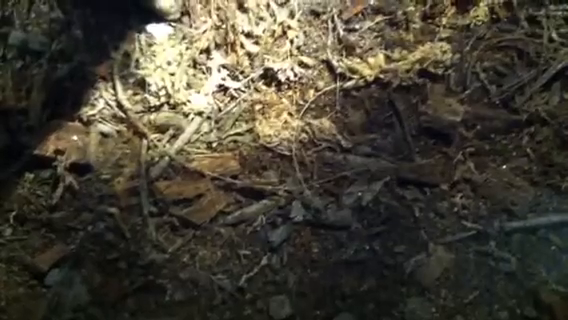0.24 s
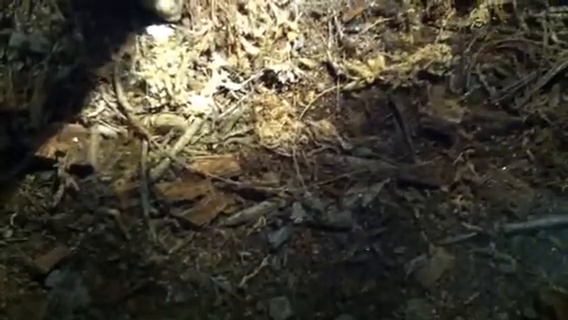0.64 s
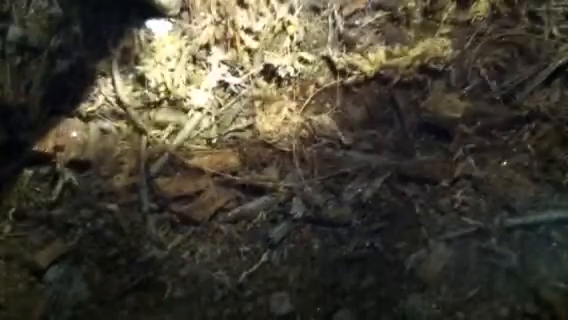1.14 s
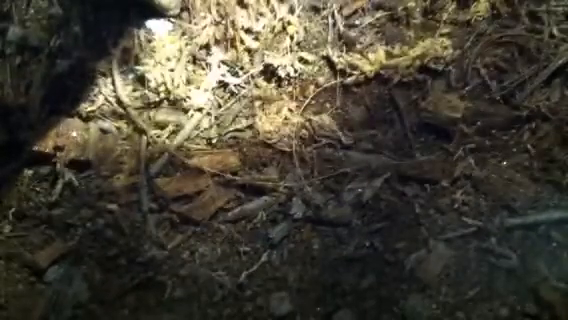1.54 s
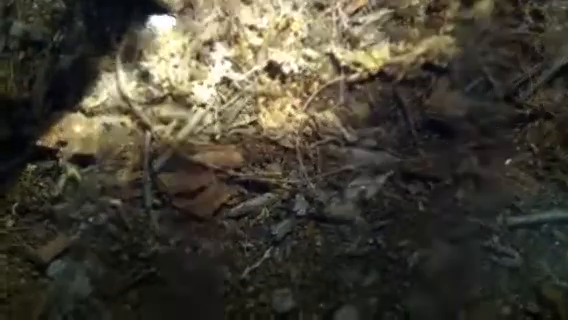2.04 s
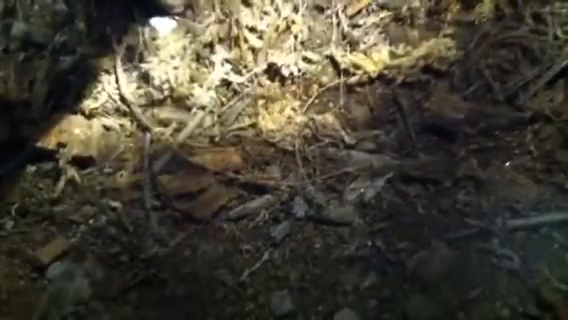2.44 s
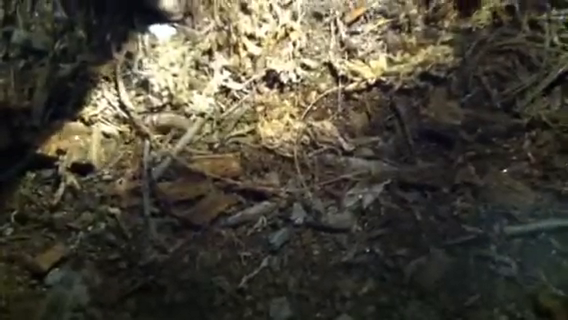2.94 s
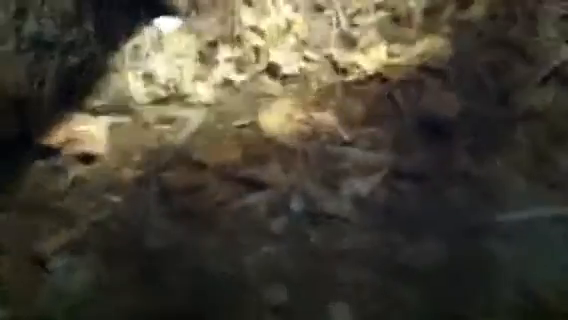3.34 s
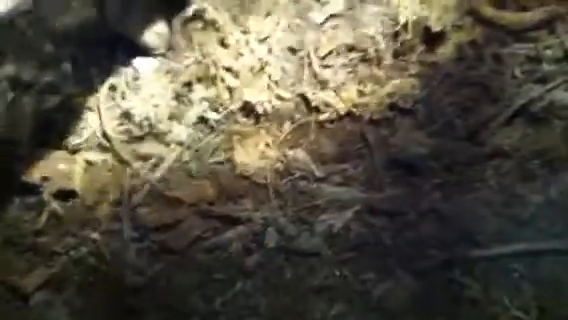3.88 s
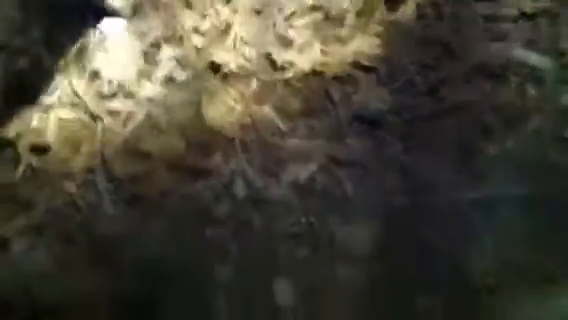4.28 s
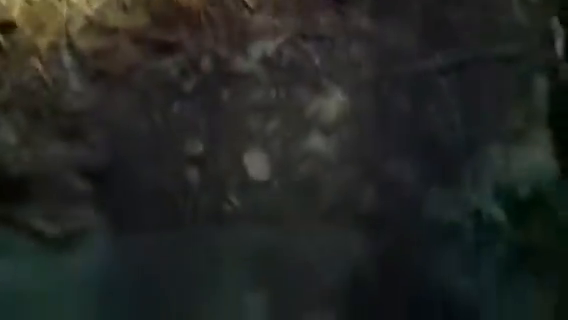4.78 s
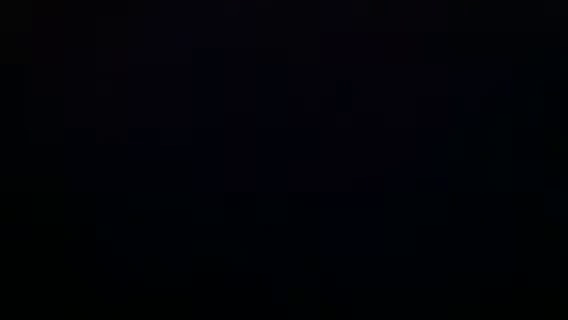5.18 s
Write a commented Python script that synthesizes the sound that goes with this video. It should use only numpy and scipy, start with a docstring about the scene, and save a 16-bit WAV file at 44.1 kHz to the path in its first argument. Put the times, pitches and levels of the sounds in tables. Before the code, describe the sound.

Hands fumble close up at a small soil enclosure: irregular taps, soft thuds, dry litter rustles, then hard plastic knocks and scrapes.

```python
"""Hands at a small soil enclosure

Close up in a quiet room, fingers tap the walls of an enclosure of soil and moss, pat the soil and brush
the litter: coloured noise bursts, panel modes and streams of grains. Skin rubs and rasps along the wall.
A hard plastic edge bumps, drags and catches in sharp ticks, and the floor booms: struck and scraped modes.
Late on, a palm lands and rubs. Filtered noise makes the room air, and a wavering sine the faint fan.
"""
import sys
import numpy as np
from scipy import signal
from scipy.fft import rfft, irfft
from scipy.io import wavfile
from scipy.ndimage import uniform_filter1d, map_coordinates

SR = 44100
rng = np.random.default_rng(int(sys.argv[2]) if len(sys.argv) > 2 else 0)


def store_wav(level_fs):
    """Save 16-bit WAV to argv[1]."""
    pcm = np.round(np.clip(np.atleast_2d(level_fs), -1, 1) * 32767)
    wavfile.write(sys.argv[1], SR, pcm.T.astype(np.int16))


N = 238845
TIME = np.arange(N) / SR  # seconds
HIT_SIZE = 8192  # samples in a single hit
AGE = np.arange(HIT_SIZE) / SR  # seconds since the hit began

# Spectrum of the room air. Each row: frequency in Hz, gain in dB.
ROOM_COLOUR = [(30, -43.5), (80, -40), (115, -8.5), (190, -8.5), (222, -9.5), (255, -17.5), (300, -18.5),
               (1140, -25.5), (2100, -26), (4450, -29.5), (5150, -37), (8300, -41), (15500, -61.5)]
AIR_DB = -58.5
FAN_HZ, FAN_DB = 220.7, -56

# Slides of the fingers along the wall. Each row: start in seconds, end in seconds, top speed from 0 to 1.
FINGER_SLIDES = [(0.613, 1.86, 0.8), (1.77, 2.768, 0.86), (2.65, 3.6, 0.3), (4.965, 5.697, 0.84)]
# Spectrum of skin rubbing the wall. Each row: frequency in Hz, gain in dB.
RUB_COLOUR = [(100, -14), (250, 13), (550, 0), (1400, -3), (2900, -3.5), (3700, -9), (4600, 1),
              (5300, -18.5), (8000, -5.5), (14000, -28)]
# Spectrum of the thin hiss of fast skin. Each row: frequency in Hz, gain in dB.
HISS_COLOUR = [(2000, -36), (6500, -6), (7900, -5), (9100, 1), (10300, -15.5), (13000, -23.5), (15000, -38)]
SPEED_UP_S, SLOW_DOWN_S, RESTING_SPEED = 0.22, 0.4, 0.031
RUB_DB, HISS_DB = -54.5, -59.5  # at full speed
RUB_GROWTH, HISS_GROWTH = 0.35, 2.4  # each grows as this power of the speed
RUB_WAVER_DB = 1.2

# Strokes through the litter. Each row: start in seconds, rise in seconds, dying away as t60 in seconds,
# level in dB ahead of the tone shelves, treble lift in dB.
LITTER_STROKES = [(.07, .03, 0.27, -64.5, -21), (0.62, 0.02, 0.47, -52.5, -15.5),
                  (0.84, 0.037, 0.091, -33, 1), (0.9, 0.025, 0.096, -31.5, -2.5),
                  (1.16, 0.016, 0.46, -36, -1.5), (1.412, 0.061, 0.083, -49.5, 13),
                  (1.56, .04, 0.4, -64.5, 19.5), (2.09, 0.0068, 0.24, -40, -14.5),
                  (2.29, 0.018, 0.17, -35.5, 4), (2.42, .09, 0.64, -41.5, -0.5),
                  (4.345, 0.026, 0.27, -47, -2), (5.1, 0.12, 0.23, -44.5, 10.5)]
# Spectrum of the crackling fibres. Each row: frequency in Hz, gain in dB.
LITTER_COLOUR = [(60, -15.5), (200, 8.5), (350, 6), (540, -5.5), (950, 1.5), (2000, -8.5), (4500, -8),
                 (5300, -16.5), (8000, -10), (12500, -27.5), (15000, -35)]
# Modes of the enclosure. Each row: frequency in Hz, average level in dB, t60 in seconds.
ENCLOSURE_MODES = [(155, -10, 0.069), (190, -1.5, 0.0297), (276, 8, 0.026), (360, 0, 0.0313),
                   (495.5, 3, 0.03), (728, -6, 0.025), (819, -5.5, 0.039), (921, 2.5, 0.016),
                   (1166, -6.5, 0.012), (1580, 10.5, 0.0043)]
STROKE_BASS_PER_TREBLE = -0.82  # light, bright strokes barely move the soil

# Soft thuds on the packed soil. Each row: time in seconds, level in dB before the layer gain.
SOIL_THUDS = [(0.101, -47), (.148, -45.5), (.658, -32.5), (0.906, -32), (0.946, -32.5), (.987, -40.5),
              (1.189, -38), (5.145, -31.5)]
THUD_HZ = 345

# Taps on the walls. Each row: time in seconds, level in dB before the layer gain and tone shelves,
# treble lift in dB, t60 of the wall noise in seconds, wall note in Hz.
WALL_TAPS = [(0.481, -18.5, -2.5, .053, 1053), (0.512, -26.5, -6.5, 0.064, 1150),
             (0.609, -38.5, -21, 0.022, 785), (0.729, -36, -30, 0.15, 642), (0.787, -39, -22, .06, 740),
             (0.869, -22, 6, 0.044, 700), (1.137, -34.5, 1, 0.12, 840), (1.169, -22.5, -4.5, 0.19, 680),
             (1.776, -34.5, 14, 0.097, 906), (1.823, -24, 8, 0.097, 1715), (2.235, -31, -18, 0.062, 900),
             (2.255, -35, -1.5, 0.18, 850), (2.378, -21.5, -13.5, .065, 1283),
             (2.749, -35.5, -11.5, 0.12, 780), (2.806, -33, -8.5, 0.067, 770), (2.96, -24, -11, 0.057, 930),
             (4.075, -21.5, -9, 0.079, 752), (4.235, -13.5, -3.5, 0.093, 1517),
             (4.3468, -27, -13.5, 0.074, 1300)]
# Spectrum of a tap. Each row: frequency in Hz, gain in dB.
TAP_COLOUR = [(60, -19.5), (180, 5.5), (350, 4.5), (540, -6), (780, 1), (1150, -1), (1370, -3.5),
              (1700, -4.5), (2200, -6), (4500, 0.5), (5300, -7.5), (7600, -5.5), (11000, -19),
              (15000, -33.5)]
# Bright taps on stiff, high spots carry little bass.
BASS_PER_BRIGHT, BASS_DB_PER_OCTAVE, MID_NOTE_HZ = -0.14, -4, 620

# One drag of a fingertip.
RASP_START_S, RASP_FULLEST_S, RASP_END_S, RASP_DB = 0.53, 0.77, 2, -58.5

# Single ticks of the edge, strong ones during the shoves and a few faint ones between them.
# Each row: time in seconds, level in dB before the layer gain.
EDGE_TICKS = [(1.5675, -43), (2.0697, -19), (2.074, -23), (2.0813, -16.5), (2.0913, -21.5), (2.0976, -17),
              (3.0553, -51.5), (3.2145, -18.5), (3.2159, -11), (3.2768, -26), (3.4022, -18.5),
              (3.4215, -18), (3.4294, -8.5), (3.439, -16.5), (3.5787, -16), (3.5861, -14.5),
              (3.5974, -11.5), (3.61, -20), (4.1838, -50.5), (5.0309, -14), (5.0342, -12), (5.069, -12),
              (5.0746, -13.5), (5.0904, -14), (5.0972, -13.5), (5.243, -25)]
# Spectrum of a tick. Each row: frequency in Hz, gain in dB.
TICK_COLOUR = [(200, -26.5), (1500, -20.5), (3300, -11), (4500, 11.5), (5300, -4), (6400, 2.5), (8500, -10),
               (12000, -19), (15000, -41)]
# Modes of the plastic edge. Each row: frequency in Hz, average level in dB, t60 in seconds.
EDGE_MODES = [(2615, -5, 0.027), (3330, -17, 0.029), (4295, -3.5, 0.055), (4360, -15.5, 0.091),
              (5370, -3.5, .016), (4750, -6, 0.076), (5250, -15, .04), (6305, 0, 0.019),
              (6210, -17, 0.01218), (8210, 1, 0.0126)]
CATCH_SPREAD_DB = 5

# Shoves of the plastic edge, each a blow and then a drag. Each row: start in seconds, blow level in dB
# before the layer gain, blow colour in Hz, drag length in seconds, drag pressure in dB.
EDGE_SHOVES = [(2.0563, -18.5, 707, 0.044, -25.5), (3.1845, -27, 517, 0.0045, -36.5),
               (3.1986, -19.5, 462, 0.027, -26.5), (3.25, -29.5, 695, .003, -41.5),
               (3.259, -27, 220, 0.024, -36.5), (3.3964, -20, 267, 0.043, -26.5),
               (3.456, -20.5, 507, .011, -32.5), (3.53, -35.5, 328, .003, -46),
               (3.5638, -37, 440, 0.052, -32.5), (5.019, -26.5, 558, 0.029, -24),
               (5.058, -19.5, 380, 0.017, -31), (5.083, -20, 660, 0.021, -24),
               (5.232, -33.5, 530, 0.022, -33.5)]
# Spectrum of the grinding edge. Each row: frequency in Hz, gain in dB.
DRAG_COLOUR = [(50, -19.5), (150, -2.5), (350, 2.5), (800, 2.5), (1300, 2), (2000, -1.5), (3400, 0),
               (4550, -1), (5200, -8.5), (6400, -3), (8500, -5), (12000, -25), (15000, -44.5)]
GRIP_S, LET_GO_S = .004, 0.0072  # the edge's pressure builds, and dies away with this time constant

# Low booms of the enclosure floor during some of the shoves and just after.
# Each row: time in seconds, peak level in dB.
FLOOR_BOOMS = [(2.084, -27.5), (3.201, -20.5), (3.252, -30), (3.401, -16.5), (3.587, -24), (3.621, -34.5),
               (3.658, -44.5)]

# Hollow resonances under the palm. Each row: frequency in Hz, average level in dB, t60 in seconds.
HOLLOW_MODES = [(278, -2, 0.038), (635, -11, 0.028), (797, 3.5, 0.035), (870, 0, 0.028), (1280, -2, 0.027),
                (1440, 6, 0.059), (4580, 3, 0.017)]
# Spectrum of the rubbing palm. Each row: frequency in Hz, gain in dB.
PALM_COLOUR = [(60, -40), (200, -1), (900, -0.5), (2000, -3.5), (4600, -25), (5300, -15), (8000, -13),
               (14000, -39)]
# The palm lands hard, then rubs lightly; the landing fades with the settling time constant.
PALM_LANDS_S, PALM_FIRST_DB, PALM_REST_DB, PALM_SETTLE_S = 5.09, -33.5, -47.5, 0.049

TOP_HZ = 15100  # upper limit of the recorder


def undb(db):
    """Decibels to gain."""
    return 10 ** (np.asarray(db) / 20)


def unit(x):
    """Scale to rms 1."""
    return x / np.sqrt(np.mean(x ** 2) + 1e-20)


def fade(t60):
    """Free decay over the length of a hit: 60 dB down after t60 seconds."""
    return np.exp(-np.log(1000) * AGE / t60)


def add(out, s, x):
    """Mix x in at time s, cut off at the end of the scene."""
    i = int(s * SR)
    out[i:i + len(x)] += x[:max(N - i, 0)]


def colour(x, points, size=4096):
    """Causal minimum-phase filter through (Hz, dB) points, folded from the cepstrum."""
    hz, db = np.transpose(sorted(points))
    bins_hz = np.arange(size // 2 + 1) * SR / size
    gain = undb(np.interp(np.log(bins_hz + 1), np.log(hz), db))
    cepstrum = irfft(np.log(gain))
    cepstrum[1:size // 2] *= 2
    cepstrum[size // 2 + 1:] = 0
    impulse = irfft(np.exp(rfft(cepstrum)))[:size // 2]
    return signal.oaconvolve(x, impulse)[:len(x)]


def shelves(x, bass_db, treble_db):
    """Lift or lower both ends around the middle of the range."""
    return colour(x, [(330, bass_db), (700, 0), (1700, 0), (4200, treble_db)])


def walk(rate):
    """Smooth random wander with an rms of 1, taking a new value rate times a second."""
    hold = max(int(SR / rate), 1)
    steps = rng.standard_normal(N)[np.arange(N) // hold]
    return unit(uniform_filter1d(steps, hold))


def grains(per_s, spread_db):
    """A stream of tiny slips, mostly weak, a few strong when there is a spread."""
    happens = rng.random(N) < per_s / SR
    signs = np.sign(rng.random(N) - .5)
    sizes_db = spread_db * np.minimum(rng.exponential(size=N), 4)
    return unit(happens * signs * undb(sizes_db))


def ring(modes, scatter_db):
    """Damped modes; every point of contact weights them a little differently."""
    out = np.zeros(HIT_SIZE)
    for hz, db, t60 in modes:
        level = undb(db + scatter_db * rng.standard_normal())
        out += level * np.sin(2 * np.pi * hz * AGE) * fade(t60)
    return out


def cluster(hz, spread, t60, count):
    """A few close panel modes around one note, ringing with unrelated phases."""
    detune, phase = rng.standard_normal((2, count, 1))
    modes_hz = hz * np.exp(spread * np.tanh(detune))
    modes = np.sin(2 * np.pi * (modes_hz * AGE + phase))
    return unit(modes.sum(0) * fade(t60))


def blow(hz, below_db=-9, above_db=-19, rattle_db=-11, rattle_t60=0.042, note_db=-5):
    """A dull blow rings the enclosure; a softer contact reaches only its low modes."""
    rattle = rng.standard_normal(HIT_SIZE) * fade(rattle_t60)
    rattle = colour(rattle, [(60, -22.5), (150, 12.0), (900, -11.5), (8000, -12.5)])
    body = unit(ring(ENCLOSURE_MODES, scatter_db=2)) + undb(rattle_db) * unit(rattle)
    body += undb(note_db) * cluster(hz, spread=0.34, t60=0.027, count=3)
    push = [(40, below_db - 12.5), (hz / 3, below_db), (hz, 0), (hz * 3.7, -2), (hz * 6, above_db)]
    return unit(colour(body, push))


def stick_slip(per_s, uneven, spread_db):
    """Single slips at a loose pace, their sizes scattered by up to the spread."""
    phase = np.cumsum(per_s * np.exp(uneven * walk(rate=200))) / SR
    slips = np.diff(np.floor(phase), prepend=0)
    return slips * undb(spread_db * np.tanh(rng.standard_normal(N)))


def pressure():
    """How hard the edge bears on the wall: it grips, holds for the drag and lets go."""
    total = np.zeros(N)
    for s, _, _, length, drag_db in EDGE_SHOVES:
        grip = np.clip((TIME - s) / GRIP_S, 0, 1)
        release = np.exp(-np.clip((TIME - s - length) / LET_GO_S, 0, 20))
        total += undb(drag_db) * grip * release
    return total


def room():
    """Steady room air as coloured noise, and a small fan as a sine of wavering pitch and level."""
    air = unit(colour(rng.standard_normal(N), ROOM_COLOUR)) * undb(AIR_DB)
    turns = np.cumsum(FAN_HZ + 2 * walk(rate=9.1)) / SR
    fan = np.sin(2 * np.pi * turns) * undb(FAN_DB + walk(rate=10))
    return air + fan


def skin():
    """Skin slides on the wall with a fine rub and, at speed, a thin, airy hiss whose pitch drifts."""
    speed = np.zeros(N)
    for start, end, top in FINGER_SLIDES:
        ramps = np.minimum((TIME - start) / SPEED_UP_S, (end - TIME) / SLOW_DOWN_S)
        speed += top * np.clip(ramps, 0, 1)
    speed = np.maximum(speed, RESTING_SPEED)
    rub = unit(colour(grains(per_s=14000, spread_db=0), RUB_COLOUR))
    rub *= undb(RUB_DB + RUB_WAVER_DB * walk(rate=28))
    # Reading the noise at a wandering pace bends its pitch.
    drift = np.cumsum(1 + .035 * walk(rate=6))
    hiss = colour(rng.standard_normal(N), HISS_COLOUR)
    hiss = unit(map_coordinates(hiss, [drift], order=5, mode="mirror"))
    hiss *= undb(HISS_DB + walk(rate=46))
    return rub * speed ** RUB_GROWTH + hiss * speed ** HISS_GROWTH


def litter(growth=1.21, crumbs_db=-4, bass_db=-1):
    """Fibres crackle and larger crumbs knock on the enclosure as a stroke swells and dies away."""
    out = np.zeros(N)
    fibres = unit(colour(grains(per_s=3000, spread_db=3), LITTER_COLOUR))
    knock = shelves(ring(ENCLOSURE_MODES, scatter_db=6), -11.5, 0)
    crumbs = unit(signal.fftconvolve(grains(per_s=350, spread_db=3), knock)[:N])
    crackle = fibres + undb(crumbs_db) * crumbs
    for start, rise, t60, db, treble in LITTER_STROKES:
        span = (TIME >= start) & (TIME < start + rise + t60)
        age = TIME[span] - start
        swelling = np.minimum(age / rise, 1) ** growth
        dying = np.exp(-np.log(1000) * np.maximum(age - rise, 0) / t60)
        bass = bass_db + STROKE_BASS_PER_TREBLE * treble
        add(out, start, undb(db) * shelves(crackle[span] * swelling * dying, bass, treble))
    return out


def thuds(gain_db=-15, yield_s=0.00425):
    """A hand pats the soil, which yields for a moment, and the enclosure answers dully."""
    out = np.zeros(N)
    for s, db in SOIL_THUDS:
        push = rng.standard_normal(HIT_SIZE) * AGE * np.exp(-AGE / yield_s)
        answer = blow(THUD_HZ, below_db=-12, above_db=-30, note_db=-3)
        thud = unit(signal.fftconvolve(push, answer)[:HIT_SIZE])
        add(out, s - yield_s, undb(db + gain_db) * thud)  # the push is strongest at s
    return out


def taps(gain_db=-20, crack_db=-3, crack_t60=0.022, tail_db=-13, tail_t60=0.3, bass_db=2, note_db=-5):
    """A short crack, dense wall noise, modes around a note set by the spot struck, and a duller tail."""
    out = np.zeros(N)
    for s, db, bright, t60, hz in WALL_TAPS:
        crack, walls, tail = rng.standard_normal((3, HIT_SIZE))
        hit = unit(walls * fade(t60)) + undb(crack_db) * unit(crack * fade(crack_t60))
        hit += undb(tail_db) * shelves(unit(tail * fade(tail_t60)), 3.8, -18.5)
        note = cluster(hz, spread=0.28, t60=0.76 * t60, count=6)
        hit = unit(colour(hit, TAP_COLOUR)) + undb(note_db) * note
        bass = bass_db + BASS_PER_BRIGHT * bright + BASS_DB_PER_OCTAVE * np.log2(hz / MID_NOTE_HZ)
        add(out, s, undb(db + gain_db) * shelves(unit(hit), bass, bright))
    return out


def rasp(hz=3000):
    """Fine slips of a fingertip pick out one narrow wall resonance."""
    resonance = [(hz / 2, -35), (hz / 1.54, -11), (hz, 0), (hz * 1.18, -11), (hz * 2, -35)]
    band = unit(colour(grains(per_s=10000, spread_db=2), resonance))
    # The finger swells evenly from nothing and falls back again.
    swell = np.interp(TIME, [RASP_START_S, RASP_FULLEST_S, RASP_END_S], [0, 1, 0])
    return band * undb(RASP_DB) * swell


def tick(lean_db=0.54, ring_db=-4, scatter_db=-6, scatter_t60=0.026, snap_t60=.003):
    """A catch is one sharp snap, a quick scatter inside the plastic, and the ring of its modes."""
    snap, scatter = rng.standard_normal((2, HIT_SIZE))
    catch = unit(colour(snap * fade(snap_t60), TICK_COLOUR))
    catch += undb(scatter_db) * unit(colour(scatter * fade(scatter_t60), TICK_COLOUR))
    catch += undb(ring_db) * unit(ring(EDGE_MODES, scatter_db=5))
    return unit(colour(catch, [(3500, -lean_db), (10000, lean_db)]))  # lean tilts towards the treble


def ticks(gain_db=-19, small_db=-22):
    """The edge catches lightly while it bears on the wall; single ticks, strong or faint, are added."""
    catches = stick_slip(per_s=110, uneven=.4, spread_db=CATCH_SPREAD_DB) * pressure()
    small_tick = tick(lean_db=-3, ring_db=-12.5)
    out = undb(small_db) * signal.oaconvolve(catches, small_tick)[:N]
    for s, db in EDGE_TICKS:
        add(out, s, undb(db + gain_db) * tick())
    return out


def bumps(gain_db=-15, judder_db=-16, judder_hz=560):
    """Each shove lands with a blow, and the enclosure judders while the edge drags."""
    knocks = stick_slip(per_s=90, uneven=.45, spread_db=0) * pressure()
    out = undb(judder_db) * signal.oaconvolve(knocks, blow(judder_hz))[:N]
    for s, db, hz, _, _ in EDGE_SHOVES:
        add(out, s, undb(db + gain_db) * blow(hz))
    return out


def drags(treble_db=-2):
    """Between catches the edge grinds along in dense, uneven slips."""
    slips = grains(per_s=9000, spread_db=3.5) * undb(2 * walk(rate=460))
    grind = unit(colour(slips, DRAG_COLOUR))
    return shelves(grind * pressure(), 0, treble_db)


def booms(hz=153, t60=0.068, rise_s=0.0035, bend=0.19, settle_s=0.01, detune=0.045):
    """The floor panel swings at its lowest mode, shifted by its load and sharp while still pressed."""
    out = np.zeros(N)
    turns = np.cumsum(hz * (1 + bend * np.exp(-AGE / settle_s))) / SR
    for s, db in FLOOR_BOOMS:
        load_shift = np.exp(detune * rng.standard_normal())
        swing = np.sin(2 * np.pi * turns * load_shift) * fade(t60) * (1 - np.exp(-AGE / rise_s))
        add(out, s, undb(db) * swing / np.abs(swing).max())
    return out


def palm(rub_db=-4):
    """Uneven slips of the palm keep the hollow resonances sounding."""
    slips = grains(per_s=3300, spread_db=2)
    hollow = unit(signal.oaconvolve(slips, ring(HOLLOW_MODES, scatter_db=3.5))[:N])
    rub = unit(colour(grains(per_s=6000, spread_db=2.5), PALM_COLOUR))
    age = np.maximum(TIME - PALM_LANDS_S, 0)
    level = undb(PALM_REST_DB) + undb(PALM_FIRST_DB) * np.exp(-age / PALM_SETTLE_S)
    return (hollow + undb(rub_db) * rub) * (age > 0) * level


def echo(x, wet_db=-24.5, t60=0.34):
    """A short, dull answer from the furnished room: decaying noise after a 6 ms gap."""
    tail = rng.standard_normal(HIT_SIZE) * fade(t60) * (AGE > .006)
    tail = colour(tail, [(150, 15.5), (1000, 6.5), (4500, -4.5), (10000, -17)])
    impulse = unit(tail) / np.sqrt(HIT_SIZE)  # total energy 1
    return undb(wet_db) * signal.fftconvolve(x, impulse)[:N]


def scene():
    """The contacts and the room's answer to them, with sliding skin, room air, fan and rasp."""
    hands = litter() + thuds() + taps() + palm()
    edge = ticks() + bumps() + drags() + booms()
    contacts = hands + edge
    return (contacts + echo(contacts) + room() + skin() + rasp())[None]


def record(dry):
    """The microphone thins both ends; the recorder rounds the tallest peaks and cuts the top."""
    heard = colour(dry[0], [(50, -9.5), (85, -9.5), (130, -1), (12000, -0.5), (15000, -11.0)])
    ceiling = .9
    rounded = ceiling * np.tanh(heard / ceiling)
    top_cut = signal.ellip(8, .2, 70, TOP_HZ, fs=SR, output="sos")
    return signal.sosfilt(top_cut, rounded)[None]


dry = scene()
out = record(dry)
store_wav(out)
```